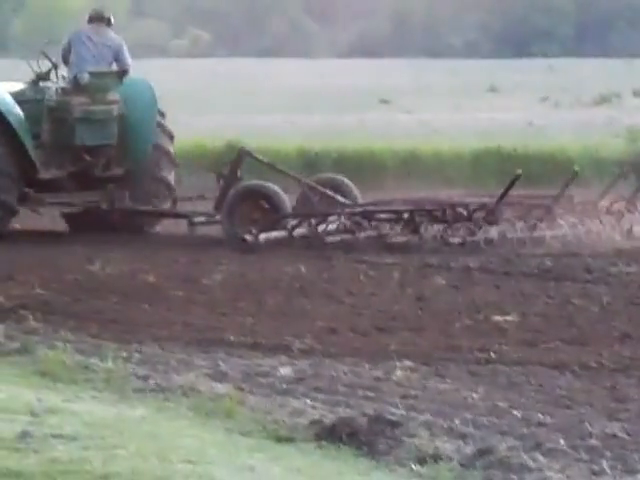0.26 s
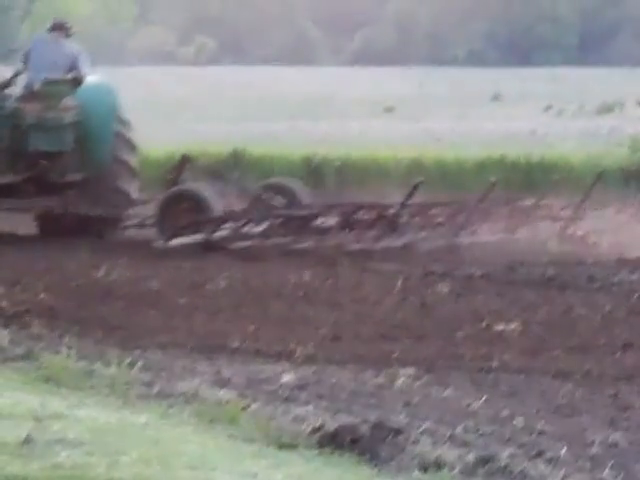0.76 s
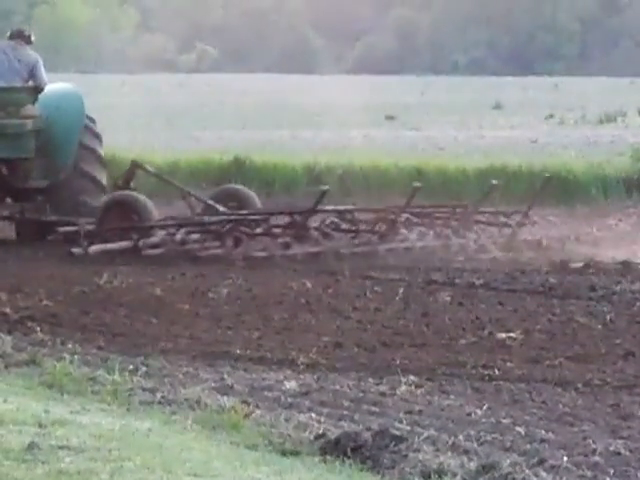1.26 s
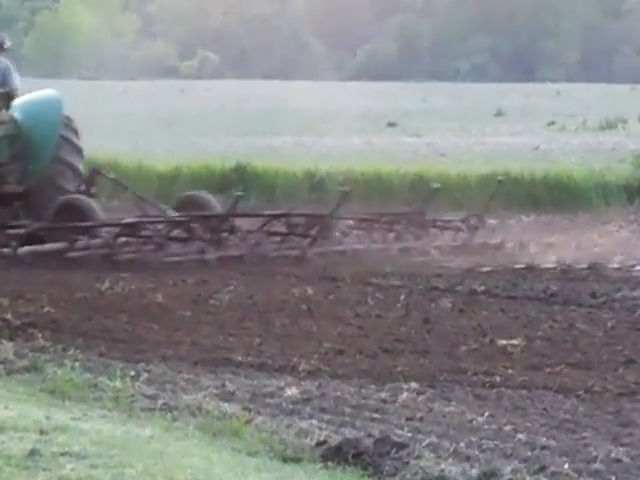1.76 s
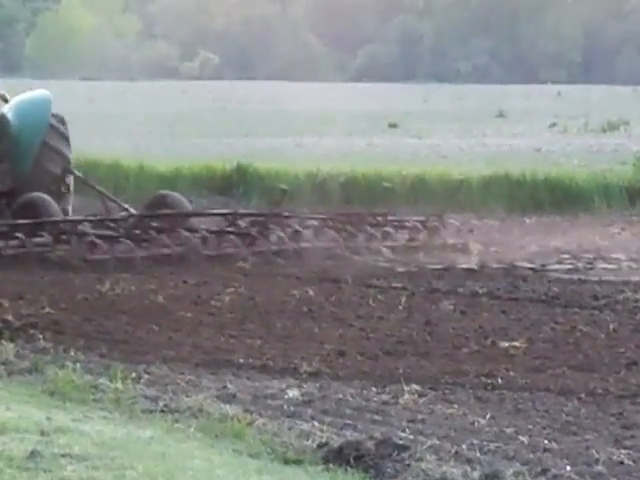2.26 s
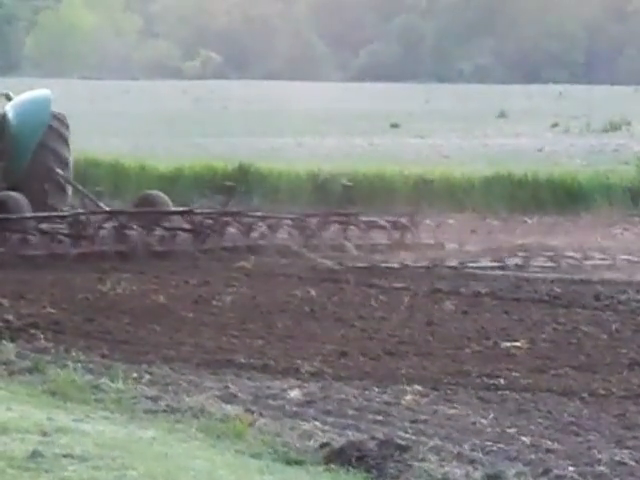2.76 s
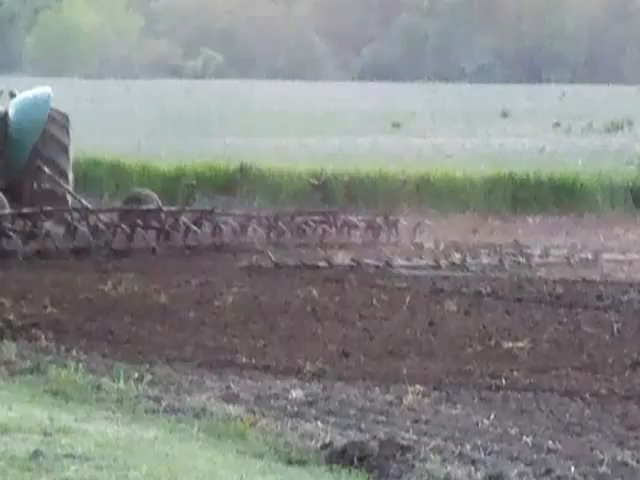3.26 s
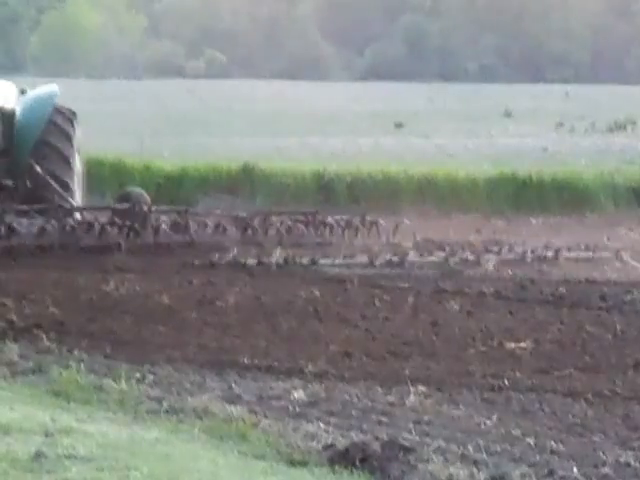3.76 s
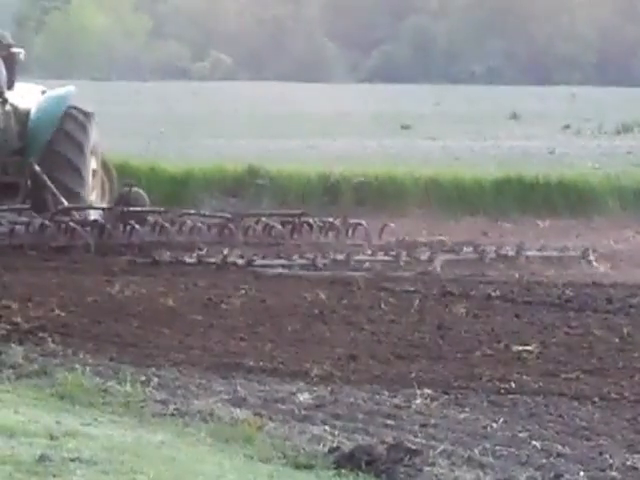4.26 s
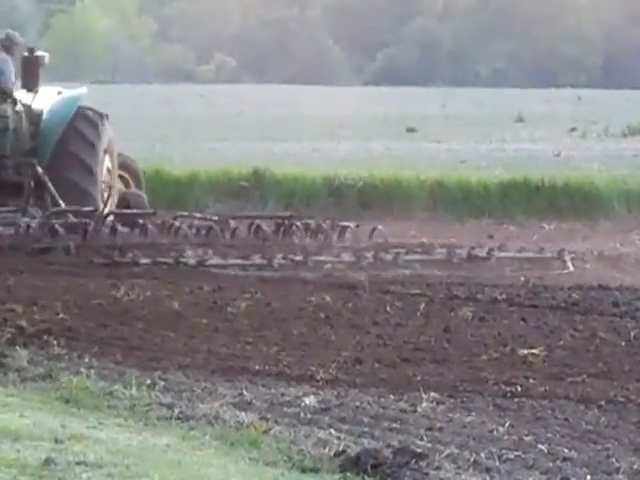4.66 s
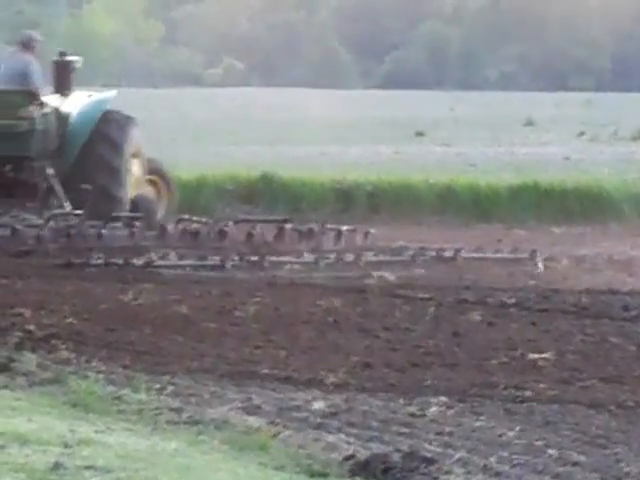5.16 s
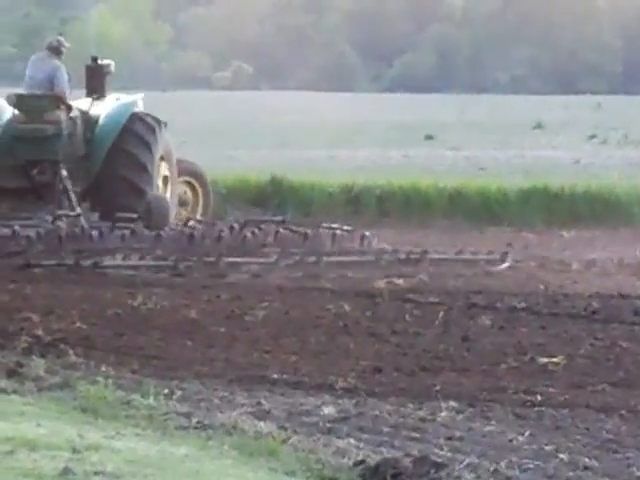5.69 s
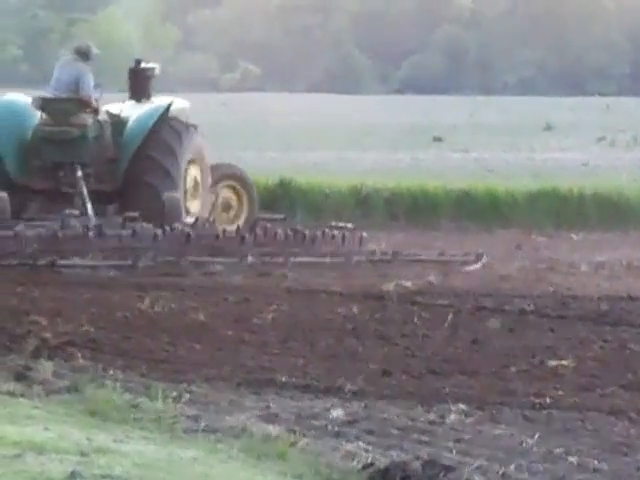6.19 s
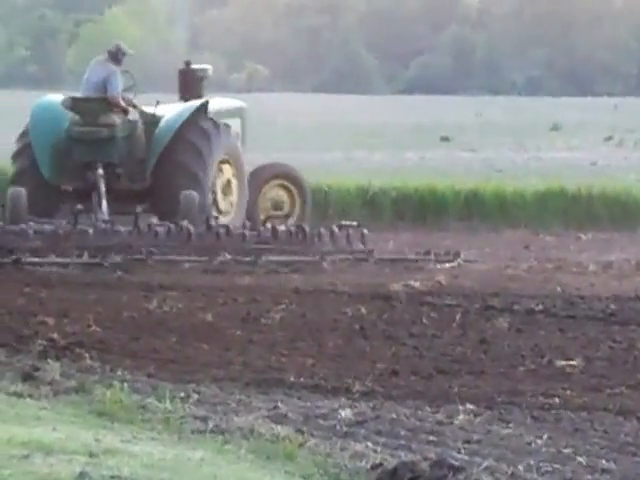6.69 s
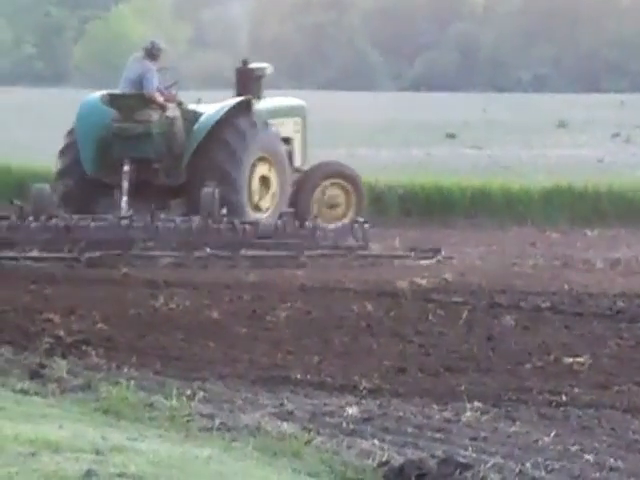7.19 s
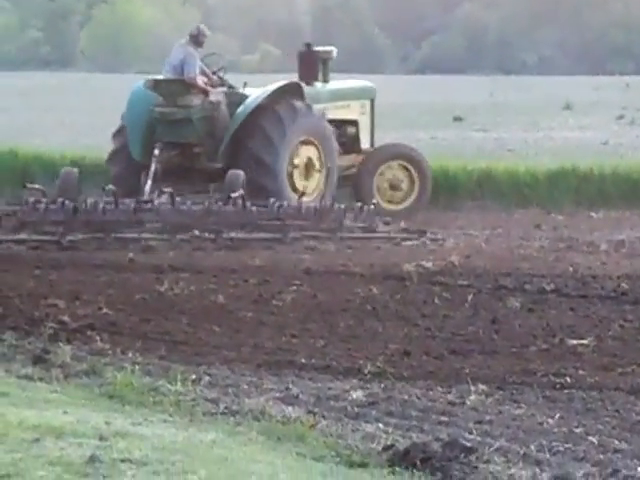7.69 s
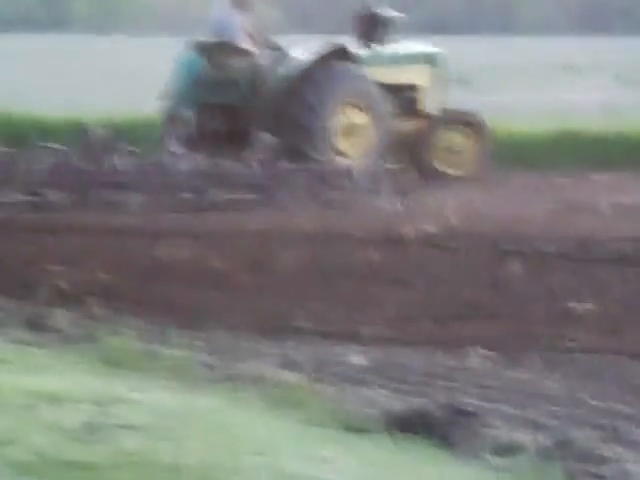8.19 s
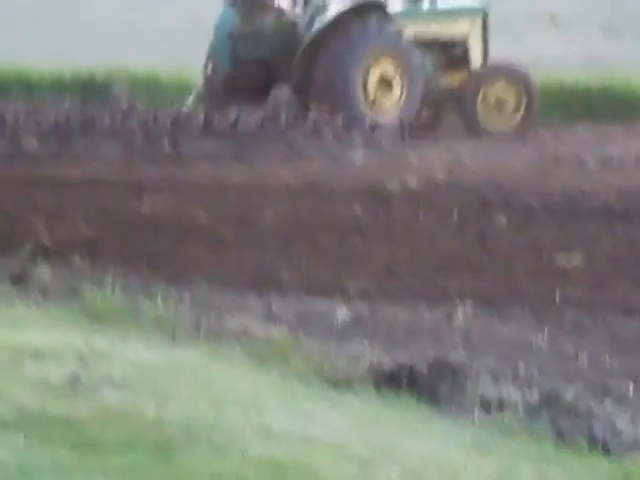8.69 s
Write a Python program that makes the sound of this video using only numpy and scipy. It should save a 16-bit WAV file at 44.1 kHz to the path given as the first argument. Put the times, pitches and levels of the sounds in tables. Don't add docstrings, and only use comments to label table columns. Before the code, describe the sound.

From 0 seconds an old two-cylinder diesel tractor is already running, pulling a harrow across an open field. Its exhaust fires in close pairs followed by a longer gap, nearly eight pairs per second: each blast a low thump echoing in the pipe, a hollow metallic puff and a bright tearing hiss, with valve gear ticking between. Dry soil rushes and crackles around the tines, swelling irregularly. A faint bright ping comes near 1.9 and a dull knock near 2.8. The hiss dips around 3.2. From 4 to 5 the engine labours and the beat slows, recovering by about 5.8. Near 6.3 the exhaust hiss is strongest. From 7 the beat runs slightly faster and freer, the deep thump changing as the tractor turns side-on, with soil scrape fuller. A short knock falls at 7.6 and a sharp tick at 8.5. It continues to the end near 9 seconds, mono, outdoors, without room echo.

```python
import sys
import numpy as np
from scipy import signal
from scipy.fft import rfft, irfft
from scipy.io import wavfile
from scipy.ndimage import uniform_filter1d

SR = 44100
rng = np.random.default_rng(int(sys.argv[2]) if len(sys.argv) > 2 else 0)


def invert_db(x):
    u = np.asarray(x, float) / 20
    return 10 ** u


def inscribe(sig):
    pcm = np.round(np.clip(np.atleast_2d(sig).T, -1, 1) * 32767)
    wavfile.write(sys.argv[1], SR, pcm.astype(np.int16))


N = 394254
SECOND = .2455


def level(x, db):
    return x * invert_db(db) / np.sqrt(np.mean(x ** 2))


def ring(x, hz, width_hz, db):
    return invert_db(db) * signal.lfilter(*signal.iirpeak(hz, hz / width_hz, SR), x)


def colour(x, spectrum):
    hz, db = np.transpose(spectrum)
    bins_hz = np.fft.rfftfreq(N, 1 / SR)
    gain = invert_db(np.interp(np.log(bins_hz + 1), np.log(hz), db))
    return level(irfft(rfft(x) * gain, N), 0)


def walk(rate_hz):
    k = int(SR / rate_hz)
    held = np.repeat(rng.standard_normal(N // k + 1), k)
    return 0.69 * uniform_filter1d(uniform_filter1d(held, k), k)[:N]


def torn(crackle_db):
    scatter = np.minimum(rng.exponential(size=N), 4)
    return rng.standard_normal(N) * invert_db(crackle_db * scatter)


def low_pass(x, order, hz):
    return signal.sosfiltfilt(signal.butter(order, hz, fs=SR, output="sos"), x)


def beat(times_s, sizes, shape):
    lead = SR // 10
    train = np.bincount(np.round(times_s * SR).astype(int) + lead, sizes, N + SR)
    return signal.fftconvolve(train, shape)[lead:lead + N]


def puff(times_s, db, start_s, rise_s, hold_s, tail_db, tail_s):
    t = np.arange(SR // 6) / SR
    fall = np.exp(-(t / hold_s) ** 2) + invert_db(tail_db) * np.exp(-t / tail_s)
    flow = (1 - np.exp(-t / rise_s)) * fall
    return np.sqrt(np.abs(beat(times_s + start_s, invert_db(2 * db), flow ** 2)))


# (time [s], speed [rpm])
SPEED = [
    (0.0, 928.8),
    (1.04, 941.6),
    (2.93, 918.2),
    (3.37, 935.0),
    (4.03, 880.3),
    (4.94, 851.6),
    (5.77, 921.9),
    (6.56, 929.4),
    (7.57, 960.5),
    (8.94, 982.8),
]


def crank():
    first_blast_s = -.0231
    t = first_blast_s + np.arange(N + SR // 8) / SR
    cycles = np.cumsum(np.interp(t, *np.transpose(SPEED))) / (120 * SR)
    start_s = np.interp(np.arange(int(cycles[-1]) + 1), cycles, t)
    return start_s, np.interp(start_s, *np.transpose(SPEED))


# (share of cycle [1], thump [dB], tick [dB])
STROKES = [
    (0, 0, -30),
    (SECOND, -.8, -30),
    (.563, 0, 0),
    (.82, -13.5, 0),
]
# (frequency [Hz], width [Hz], level [dB])
PIPE = [(96, 5, 4.5), (117.5, 6, .4), (168, 45, -6)]
# (speed [rpm], late push delay [ms], late push gain [1], early
# push delay [ms], early push gain [1], intake gain [1])
FOLLOWERS = [(852, 23.0, .74, 8.1, .42, .18), (885, 22.5, .5, 7.4, .1, .3), (910, 21.9, .43, 8.6, .0, .43),
             (928, 22.2, .44, 10.5, -.17, .46), (957, 22.2, .47, 10.2, -.31, .33),
             (983, 23.2, .39, 10.6, -.43, .09)]


def thump(start_s, period_s, deep_db, upper_db):
    share, db, _ = np.transpose(STROKES)
    times = start_s[:, None] + share * period_s[:, None]
    rpm, *columns = np.transpose(FOLLOWERS)
    now = [np.interp(120 / period_s, rpm, c)[:, None] for c in columns]
    late_ms, late, early_ms, early, intake = now
    sizes = invert_db(db + .5 * rng.standard_normal(times.shape))
    sizes[:, 2] *= intake[:, 0]
    last_push_s, last_push = .0381, .3
    times = np.stack([times, times + late_ms / 1000, times + early_ms / 1000, times + last_push_s])
    sizes = np.stack([sizes, sizes * late, sizes * early, sizes * last_push])
    peak_s, width_s = .008, .0019
    t = np.arange(SR // 50) / SR - peak_s
    push = beat(times.ravel() - peak_s, sizes.ravel(), -np.exp(-(t / width_s) ** 2))
    push = signal.sosfilt(signal.butter(2, 25, "high", fs=SR, output="sos"), push)
    push = push + sum(ring(push, *mode) for mode in PIPE)
    deep = low_pass(push, 2, 75)
    return invert_db(deep_db) * level(deep, -.3) + invert_db(upper_db) * level(push - deep, -0.34)


# (frequency [Hz], width [Hz], level [dB])
SILENCER = [(600, 75, -10), (790.5, 85, 1), (954, 14.5, -1), (1297, 560, -7.5), (1795, 237, -4.5),
            (2457, 87, -1), (2945, 270, -2.5), (3250, 320, -2.5), (3750, 680, -5.5)]
# (frequency [Hz], width [Hz], level [dB])
SHELL = [(1566, 290, -7), (1531, 20, 7.5), (1590, 25.4, 4.5)]


def silencer(blasts_s, shell_db):
    db = rng.standard_normal(blasts_s.size)
    flow = puff(blasts_s.ravel(), db, start_s=-.0034, rise_s=.012, hold_s=.013, tail_db=-8.5, tail_s=.03)
    gas = torn(3.1) * flow
    patchy_db = 1.8 * rng.standard_normal((blasts_s.size, len(SILENCER)))
    t = np.arange(N) / SR
    out = invert_db(np.interp(t, blasts_s[:, 1], shell_db)) * sum(ring(gas, *mode) for mode in SHELL)
    for k, mode in enumerate(SILENCER):
        patchy = invert_db(np.interp(t, blasts_s.ravel() + 0.0014, patchy_db[:, k]))
        out = out + (-1) ** k * ring(gas * patchy, *mode)
    return level(out, 0)


# (frequency [Hz], density [dB per Hz])
LOW_JET = [(3500, -14.5), (4300, -9), (4700, 0.5), (5050, 4), (5500, 0), (6500, -2), (7500, -2.5),
           (10000, -47)]
# (frequency [Hz], density [dB per Hz])
HIGH_JET = [(4500, -29), (6800, -3.5), (8700, 4.5), (9500, 1.5), (10500, 3), (11500, -2), (13000, -10),
            (14500, -22)]


def jet(blasts_s, low_db, high_db):
    times_s = blasts_s.ravel()
    low = puff(times_s, low_db.ravel(), start_s=-0.00041, rise_s=0.0044, hold_s=0.011,
               tail_db=-4.0, tail_s=0.019)
    high = puff(times_s, high_db.ravel(), start_s=-0.00067, rise_s=0.0027, hold_s=.010,
                tail_db=-14.5, tail_s=0.019)
    return invert_db(3) * low * colour(torn(2.6), LOW_JET) + invert_db(3.5) * high * colour(torn(0.74), HIGH_JET)


def stack(x):
    round_trip_ms, gain_start, gain_per_s, opens_s = .57, 0.067, 0.091, 6.14
    i = np.arange(N)
    gain = gain_start + gain_per_s * np.maximum(i / SR - opens_s, 0)
    return x + gain * np.interp(i - round_trip_ms * SR / 1000, i, x)


def bonnet(x, lag_ms=1.6, drift_ms=.7, gain=.28):
    i = np.arange(N)
    path_ms = lag_ms + drift_ms * walk(4.6)
    return x + gain * np.interp(i - path_ms * SR / 1000, i, x)


def ticks(start_s, period_s):
    share, _, db = np.transpose(STROKES)
    times = start_s[:, None] + share * period_s[:, None]
    db = db + 3.3 * rng.standard_normal(times.shape)
    flow = puff(times.ravel(), db.ravel(), start_s=-.001, rise_s=.004, hold_s=.012, tail_db=-40, tail_s=.02)
    block = [(500, -31), (800, -4), (1500, 2), (3000, -6), (5500, -14), (7500, -5), (10000, -9.5),
             (12500, -22), (15000, -35)]
    return flow * colour(torn(2.5), block)


# (frequency [Hz], density [dB per Hz])
SOIL = [(30, 2.5), (150, 8), (260, -4.5), (350, -8), (510, -5.5), (580, 1.5), (1000, -3.5), (1500, -0.5),
        (2200, -7), (4000, -10.5), (8000, -17), (13000, -24), (15000, -46)]


def harrow():
    grit = colour(torn(1.3), SOIL)
    swell, out = walk(3.3), 0
    for hz in (250, 500, 1000, 2000, 4000, 8000):
        below = low_pass(grit, 1, hz)
        grit = grit - below
        out = out + below * invert_db(0.36 * swell + 0.45 * walk(13))
    return level(out + grit * invert_db(0.99 * swell + 2.0 * walk(25)), 0)


# (time [s], frequency [Hz], level [dB], t60 [s])
CLINKS = [
    (2.843, 820, -24, 0.08),
    (7.565, 804, -19.5, 0.041),
    (1.852, 3300, -35, .12),
    (1.985, 3250, -59, .12),
    (8.494, 3440, -24, 0.033),
    (8.522, 3730, -41.5, 0.17),
    (8.545, 3870, -51, 0.12),
]


def clinks(rate_hz=28, soft_db=-47):
    gap, pitch, loudness, decay = rng.random((4, 250))
    faint = np.c_[np.cumsum(2 * gap / rate_hz), 550 * 11 ** pitch, soft_db + 8 * loudness, .04 + .14 * decay]
    out, t = np.zeros(N + SR), np.arange(SR // 8) / SR
    attack = np.minimum(t / 0.00027, 1)
    for s, hz, db, t60_s in [*CLINKS, *faint[faint[:, 0] < N / SR]]:
        i = int(s * SR)
        out[i:i + len(t)] += invert_db(db - 60 * t / t60_s) * np.sin(2 * np.pi * hz * t) * attack
    return out[:N]


# (time [s], pipe pressure [dB], gas jet [dB], jet brightness [dB], shell ring [dB])
EXHAUST = [(0, -34, -24.5, 0.5, 0), (.4, -33, -28, 2, 2), (.9, -34, -25.5, 3.5, -1),
           (1.26, -33.5, -25.5, -1.5, -0.5), (1.7, -31.5, -24.5, -1, 2.5), (2.25, -34, -25, 4.5, -6.5),
           (3.15, -34.5, -33.5, 2.5, -2), (3.6, -31, -24, -4, -2), (4.2, -32.5, -23, -1.5, -5.5),
           (4.75, -31.5, -26.5, 0, -1.5), (5.35, -31.5, -25, 4, 2), (5.7, -32.5, -23, -3.5, -6.5),
           (6.27, -35, -20, 4.5, -3), (6.85, -40, -26, -0.5, 0.5), (7.4, -39, -26, 5.5, -4),
           (7.8, -38, -28, 7.5, -3), (8.4, -38, -24, 1.5, -1), (8.94, -36, -26.5, 0, 0)]


def scene():
    t = np.arange(N) / SR
    s, *columns = np.transpose(EXHAUST)
    pipe_db, jet_db, bright_db, shell_db = (np.interp(t, s, c) for c in columns)
    side_on_s, swing_s = 7.25, 0.82
    side = 1 / (1 + np.exp((side_on_s - t) / swing_s))
    pull_db, blow_db = pipe_db - pipe_db.mean(), jet_db - jet_db.mean()
    over_rpm = np.interp(t, *np.transpose(SPEED)) - 930
    deep_db = pipe_db - 1.5 + 8.5 * side - 0.0636 * over_rpm
    silencer_db = -32.5 + 0.6 * side + .35 * blow_db + 0.28 * pull_db
    harrow_db = -42.5 + 2.5 * side + 0.72 * pull_db + 0.2134 * t

    start_s, rpm = crank()
    period_s = 120 / rpm
    blasts_s = start_s[:, None] + np.array([0, SECOND]) * period_s[:, None]
    scatter_db, shell_scatter_db = 1.1, 1.7
    chance = rng.standard_normal((len(start_s), 5))
    low_db = np.interp(blasts_s, t, jet_db) + [0, 0.95] + scatter_db * chance[:, :2]
    high_db = np.interp(blasts_s, t, jet_db + bright_db) + [0, 1.33] + scatter_db * chance[:, 2:4]
    ring_db = np.interp(start_s, t, shell_db) + shell_scatter_db * chance[:, 4]

    out = thump(start_s, period_s, deep_db, pipe_db)
    out = out + invert_db(silencer_db) * silencer(blasts_s, ring_db)
    out = out + bonnet(stack(jet(blasts_s, low_db - 4.5, high_db - 4.5)))
    out = out + invert_db(silencer_db - 4.5) * ticks(start_s, period_s)
    out = out + invert_db(harrow_db + 6.0) * harrow() + clinks()
    return out[None]


def roll_off(x):
    return signal.sosfilt(signal.butter(12, 15260, fs=SR, output="sos"), x)


def record(dry):
    top_hz = 13950
    cut = signal.sosfilt(signal.ellip(8, .5, 60, top_hz, fs=SR, output="sos"), dry)
    return roll_off(cut)


dry = scene()
out = record(dry)
inscribe(out)
```